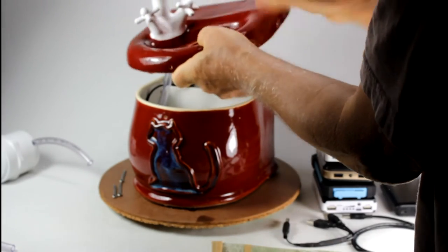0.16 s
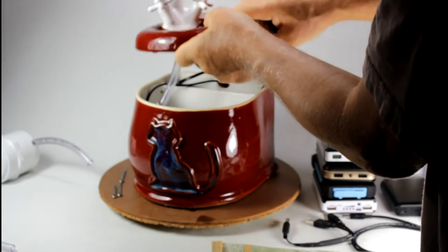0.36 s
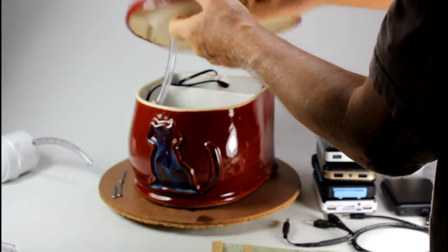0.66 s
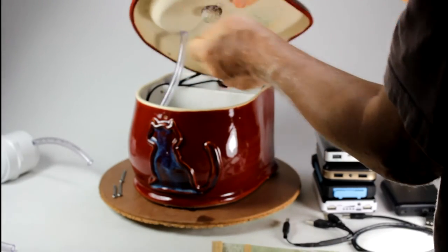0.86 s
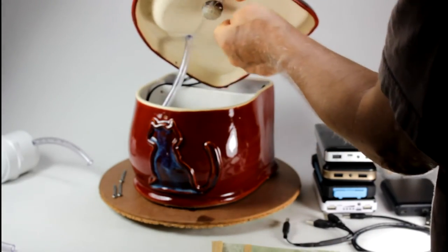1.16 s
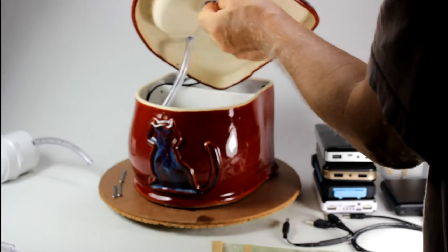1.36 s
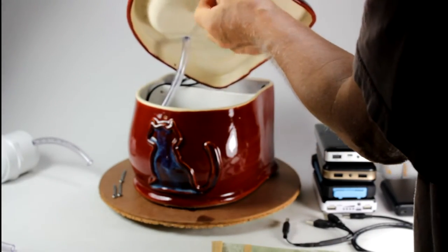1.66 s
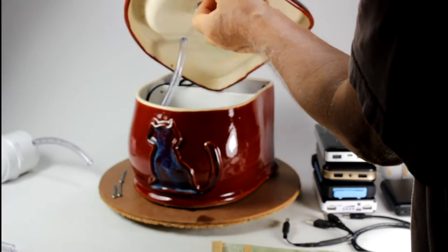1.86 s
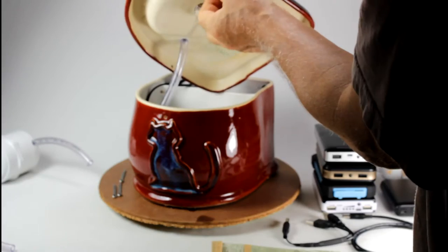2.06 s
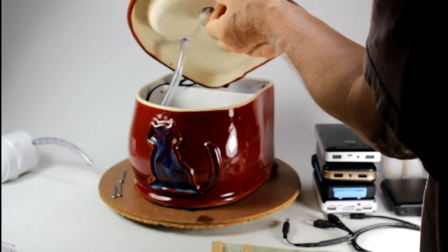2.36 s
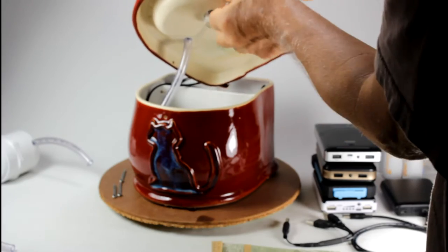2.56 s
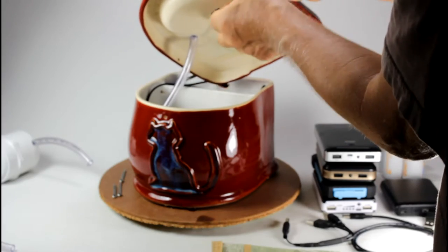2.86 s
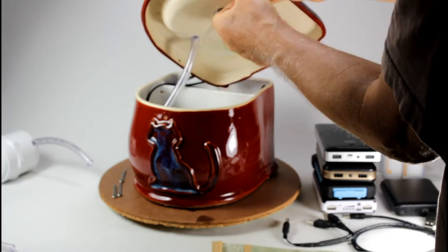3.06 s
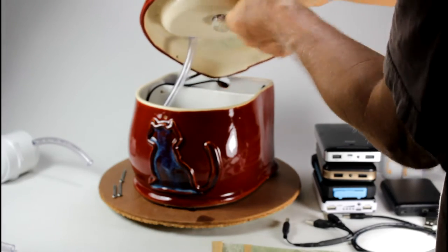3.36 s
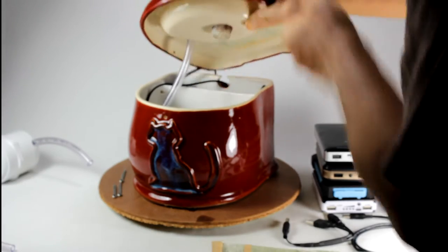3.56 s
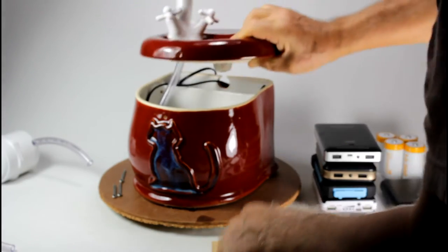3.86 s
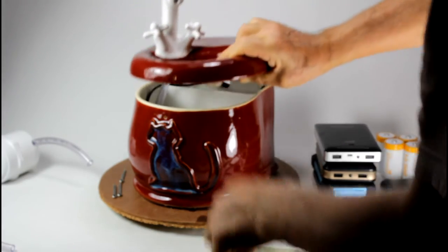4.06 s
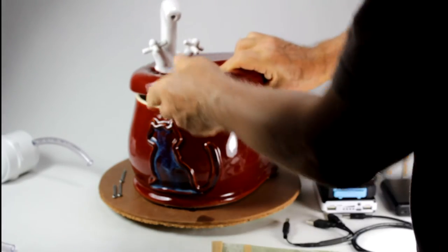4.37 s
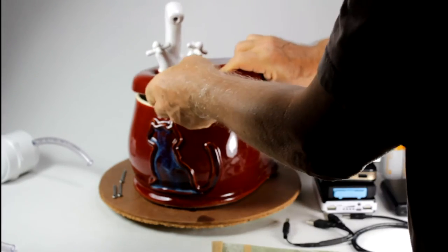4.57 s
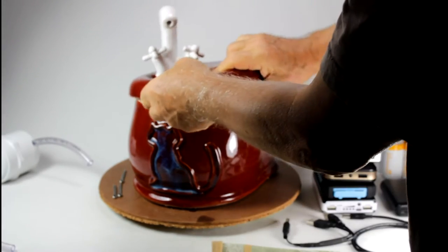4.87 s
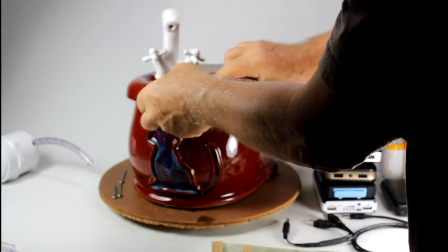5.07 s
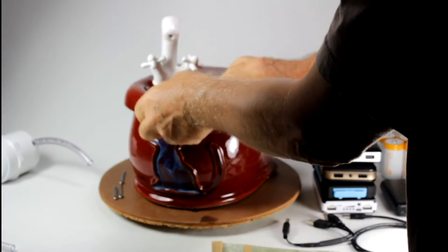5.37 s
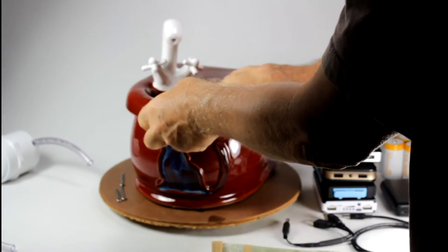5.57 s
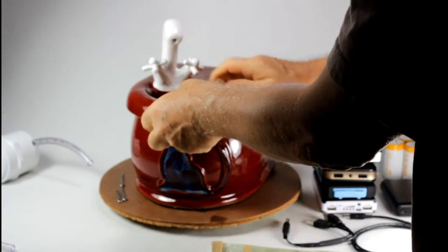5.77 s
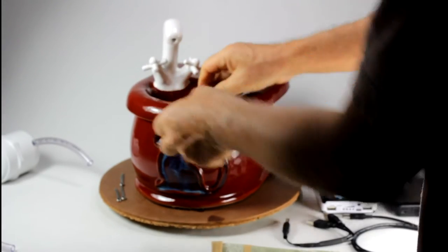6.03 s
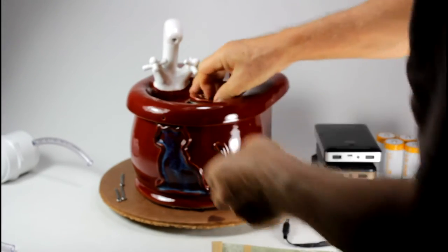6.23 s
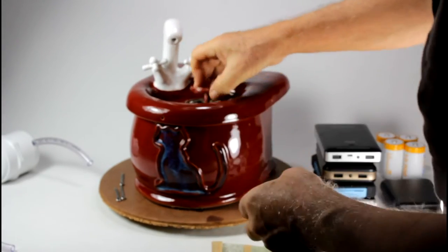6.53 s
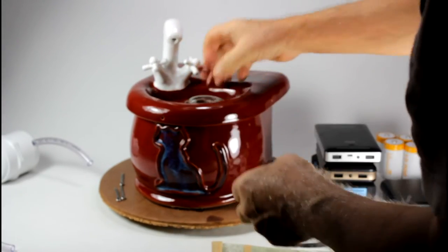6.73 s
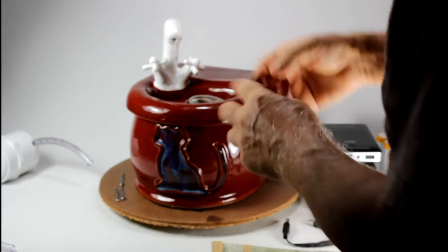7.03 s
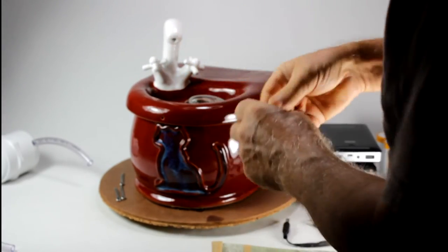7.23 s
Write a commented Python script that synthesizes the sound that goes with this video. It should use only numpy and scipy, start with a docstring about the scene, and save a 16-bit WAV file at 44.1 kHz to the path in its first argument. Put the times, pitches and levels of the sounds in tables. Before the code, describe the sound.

Irregular pottery clinks, dull knocks and gritty glaze rubs as a lid is lifted, turned and seated on a ceramic pot, over steady hiss.

```python
"""Ceramic lid and bowl

A glazed ceramic lid is handled over its bowl in a small room, close to a mono microphone.
Knocks and clinks ring the modes of lid and bowl over a dull knock; fingers and rim rub the glaze
as dense tiny clicks. Echoes and a steady hiss lie behind. The loudest blow overloads the recorder:
peaks clip with a low thump, and its gain control ducks everything, then creeps back."""
import sys
import numpy as np
from scipy import signal
from scipy.fft import rfft, irfft, next_fast_len
from scipy.io import wavfile

SR = 44100
rng = np.random.default_rng(int(sys.argv[2]) if len(sys.argv) > 2 else 0)


def int16_out(signal):
    """Quantize to a 16-bit WAV file."""
    q = np.round(np.clip(np.atleast_2d(signal).T, -1, 1) * 32767)
    wavfile.write(sys.argv[1], SR, q.astype(np.int16))


N = 326340   # length in samples


def from_db(db):
    """Turns decibels into an amplitude factor."""
    return 10 ** (np.asarray(db) / 20)


def rms_one(x):
    """Scales a signal to an RMS of one."""
    return x / np.sqrt(np.mean(x ** 2) + 1e-20)


# Blows of lid, bowl and fingers, one per row: start_s, lead_hz (mode that stands out), lift_db (of that mode),
# level_db, spot, bright_db (per octave), favoured_db (the spot's favoured modes),
# grip (share of ring time left), contact_ms (time constant of the onset)
BLOWS = [(0.342, 790, 4, -28, "bowl belly", -1, -9, 0.47, 10.5),
         (0.638, 5740, 17, -20, "lid stem", 0, -4, 1, 0.76),
         (0.7225, 4950, 8, -6, "bowl wall", 1, -0.1, 0.53, 0.73),
         (1.1225, 1905, 8.5, -25.5, "inner wall", 0, -1.5, 0.54, 1.6),
         (1.279, 474, 14, -27, "inner wall", 2.5, -14, 0.32, 2.3),
         (1.313, 360, 7, -32.5, "inner wall", -1, -4, 0.63, 4.5),
         (1.368, 1905, 7, -24.5, "inner wall", 0.8, -0.5, 0.73, 0.65),
         (1.4815, 2695, 6.5, -11, "lid face", 3, -0.9, 0.38, 0.3),
         (1.701, 590, 9, -37, "bowl wall", -3, -2.4, 0.63, 0.55),
         (1.749, 4550, 12, -49, "fingernail", 8.5, -8, 0.88, 6.7),
         (2.155, 3330, 11, -30.5, "lid stem", 6.5, 14.5, 0.15, 1.6),
         (2.2, 1185, -6, -19.5, "lid face", -1.5, 3.5, 0.49, 7),
         (2.232, 625, 4, -18, "lid face", 1.5, -5.5, 0.44, 0.97),
         (2.454, 2760, 9, -20.5, "lid stem", 2.1, -6.8, 0.61, 1.8),
         (3.106, 11500, 8, -52.5, "fingernail", 6, 2, 0.46, 1.6),
         (3.472, 6170, 7, -21, "fingernail", 1.5, 0, 0.71, 12),
         (3.798, 1400, 14.5, -24, "inner wall", 14.5, 4.5, 0.31, 2.2),
         (4.036, 950, 7, -28.5, "inner wall", 2, -8, 0.46, 1.4),
         (4.186, 625, 10.5, -25, "inner wall", -1.5, 2, 0.18, 0.57),
         (4.448, 1745, 5, -16, "inner wall", -2, -6, 0.58, 2.1),
         (4.627, 2135, -4, -3, "lid seat", 1.7, 1.2, 0.64, 4.6),
         (4.799, 3500, 15, -11, "lid stem", -3.8, 8.7, 0.44, 6.3),
         (4.869, 950, 2.5, -27.5, "lid seat", -3, 2, 0.69, 3.3),
         (5.268, 2135, 13.5, -17.5, "lid edge", 1.5, 2.5, 0.61, 1.4),
         (5.367, 410, 5, -32, "bowl belly", 2, 4, 0.67, 3.1),
         (5.461, 2135, 5.5, -30, "bowl rim", 5.5, -6, 1, 4.5),
         (5.5055, 950, 11, -6.5, "bowl rim", -5, -7, 0.14, 0.38),
         (5.5145, 360, 6.5, -1.1, "bowl rim", 1.27, 1.64, 0.55, 0.5),
         (5.803, 625, 4, -44, "lid edge", 1, -10, 0.94, 1.2),
         (5.915, 950, 1.5, -17.5, "lid edge", -3.5, 2, 0.97, 1),
         (6.049, 2008, 9, -16, "bowl belly", 6, 5.5, 0.36, 9),
         (6.14, 3790, 7.5, -17, "lid edge", -0.55, 0, 0.81, 1.3),
         (6.634, 360, 1, -38.5, "bowl belly", -2, -2.5, 0.42, 5.8),
         (6.689, 3790, 1, -24.5, "lid top", -0.3, -2, 0.91, 0.62),
         (6.736, 950, 12.5, -10, "bowl belly", 3.6, -9.5, 0.33, 6)]


def blows():
    """Each blow rings every mode and adds a dull knock; a longer contact softens its onset."""
    out = np.zeros(N + SR)
    t = np.arange(SR // 2) / SR
    chances = rng.standard_normal((len(BLOWS), len(WARE), 2))
    rattles = rng.standard_normal((len(BLOWS), 5, len(t)))
    for blow, chance, rattle in zip(BLOWS, chances, rattles):
        start_s, lead_hz, lift_db, level_db, spot, bright_db, favoured_db, grip, contact_ms = blow
        colour_db = blow_colour(spot, bright_db)
        rings = ringing(t, colour_db, spot, bright_db, favoured_db, lead_hz, lift_db, grip, chance)
        onset = 1 - np.exp(-1000 * t / max(contact_ms, .2))
        tail = np.minimum(1, (t[-1] - t) * 10)   # the last 100 ms fade out
        at = round(start_s * SR)
        out[at:at + len(t)] += from_db(level_db) * (rings + knock(t, colour_db, rattle)) * onset * tail
    return out[:N]


# Edges of the five registers, thud to top: edge_hz
REGISTERS_HZ = np.array([110, 300, 900, 2300, 5000, 15500])
CENTRES_HZ = np.sqrt(REGISTERS_HZ[1:] * REGISTERS_HZ[:-1])
PIVOT_HZ = 1500   # brightness turns about this pitch
# Spots that are struck, by name: (thud_db, low_db, middle_db, high_db, top_db),
# then the modes the spot favours as pairs (pitch_hz, level_db)
SPOTS = { "bowl wall": ([-28.5, -16.5, -2, -15.5, -36.5], [(590, -8), (625, -10), (780, -17.5), (1040, -9),
         (2008, -10), (3330, -12.5)]), "inner wall": ([-38, -9.5, -18.5, -22, -62], [(590, -24.5),
         (625, -21.5), (700, -21), (1400, -15.5), (1745, -11), (1905, -15.5)]),
         "lid face": ([-32, -9.5, -5, -17, -36], [(625, -17), (790, -22.5), (1040, -19.5), (1185, -5.5),
         (1745, -9), (2135, -40)]), "lid seat": ([-23, -1, -6, -15, -32.5], [(474, -4.5), (590, -10),
         (950, -8), (1040, -14.5), (1185, -14.5), (2135, -13.5)]),
         "lid stem": ([-53, -44, -17.5, -12.5, -32], [(950, -21.5), (2008, -25), (2760, -12.5), (3100, -21),
         (3330, -21.5), (3790, -33)]), "lid edge": ([-52, -19, -16, -2, -15], [(950, -20), (1185, -18),
         (3500, -11.5), (3790, -30.5), (4550, -17.5), (5460, -18.5), (6900, -13.5)]),
         "lid top": ([-38, -22, -23, -25, -12], [(2135, -36), (2760, -22), (3100, -24), (3790, -20),
         (4550, -5.5), (6900, -8)]), "bowl belly": ([-9.5, -5, -12, -23.5, -36.5], [(360, -11), (410, -7.5),
         (474, -11.5), (790, -25), (950, -16), (1040, -17)]), "bowl rim": ([-50, -10.5, -2.5, 0.6, -24],
         [(360, -19.5), (625, -15), (950, -14.5), (1470, -3.5), (2695, -8.5), (4200, -26.5)]),
         "fingernail": ([-44, -65, -59, 2, -6], [(2135, -18), (4550, -15), (5700, -9), (6170, -1),
         (6900, -9), (11500, -17)]), }


def blow_colour(spot, bright_db):
    """Level in each register: the colour of the struck spot, tilted by the blow's brightness."""
    return SPOTS[spot][0] + bright_db * np.log2(CENTRES_HZ / PIVOT_HZ)


# Modes of lid and bowl: pitch_hz, struck_db, rubbed_db, t60_s (ringing free)
WARE = [(383.3, 2, -10, 0.4), (418.4, -5.5, 7.5, 0.13), (462, 7.5, 2.5, 0.18), (582.3, 2.5, -25.5, 0.17),
        (627, -0.5, -3, 0.28), (699.4, 1, -34, 0.2), (788, 4.5, -22, 0.21), (800, -21.5, -27, .2),
        (951, 2, -14, 0.19), (1044.4, -3, -9.5, 0.31), (1184, -1, 0, 0.65), (1385, 5.5, -32, 0.092),
        (1478.5, -2, -9.5, 0.52), (1717, 0.5, -15, 0.12), (1890, 1.5, -33.5, 0.12), (2018, -1, -25, 0.31),
        (2136, -8.5, -3, 0.6), (2716, 1, -9.5, 0.44), (2791, 2.5, 3, 0.11), (3088, -1.5, 1, 0.35),
        (3333, 6.5, -15, 0.13), (3515, -3, 1.5, 0.16), (3803, -8, -35, 0.34), (4330, -0.5, -7.5, .3),
        (4492, -10.5, -2.5, 0.22), (4870, -14.5, -34.5, 0.048), (4950, -21.5, -36, .2),
        (5516, -4, -22, 0.26), (5720, -2, -1, 0.11), (6043, 11.5, -22.5, 0.055), (6936, -1.5, -7.5, 0.24),
        (8700, -0.5, -11.5, .15), (9340, -8, -2, 0.4), (11420, -1.5, -27, 0.17), (13180, 3, -22, .1)]
# The spot's other modes: level, random spread, share of the favoured modes' ring time
OTHERS_DB, SPOT_SPREAD_DB, OTHERS_RING = -13.5, 3.5, 0.6
# Twin modes: level against the first, ring time as a multiple, pitch offset as a share
TWIN_DB, TWIN_LONGER, TWIN_SPLIT = -14, 1.9, 0.00583


def ringing(t, colour_db, spot, bright_db, favoured_db, lead_hz, lift_db, grip, chance):
    """Decaying sines: the spot's favoured modes follow their own levels, the rest its colour."""
    hz, struck_db, _, t60 = np.transpose(WARE)
    spread_db = SPOT_SPREAD_DB * chance[:, 0]
    db = np.interp(np.log(hz), np.log(CENTRES_HZ), colour_db) + struck_db + OTHERS_DB + spread_db
    liked_hz, liked_db = np.transpose(SPOTS[spot][1])
    liked = np.abs(hz[:, None] - liked_hz).argmin(axis=0)
    db[liked] = liked_db + favoured_db + bright_db * np.log2(hz[liked] / PIVOT_HZ)
    lead = np.abs(hz - lead_hz).argmin()
    db[lead] += lift_db
    # the fingers rest on the nodes of the favoured modes and damp the others more
    is_liked = np.isin(np.arange(len(hz)), np.append(liked, lead))
    ring_left = np.clip(grip, .1, 1.5) * np.where(is_liked, 1, OTHERS_RING)
    fall = -np.log(1000) * t / (t60 * ring_left)[:, None]
    # a round vessel has its modes in pairs: the weaker twin lies close by, beats with the first and outlasts it
    tones = np.exp(fall) * np.sin(2 * np.pi * hz[:, None] * t)
    twins = np.exp(fall / TWIN_LONGER) * np.sin(2 * np.pi * hz[:, None] * (1 + TWIN_SPLIT) * t)
    signs = np.sign(chance[:, 1])
    return (from_db(db) * signs) @ tones + from_db(db + TWIN_DB) @ twins


# Knock level in each register, thud to top: level_db
KNOCK_DB = [-4, -8, -6, -6, -1]
KNOCK_T60_S, KNOCK_DAMPING = .065, .25   # fade at 1 kHz; exponent that shortens it towards the treble


def knock(t, colour_db, rattle):
    """Dense unresolved modes heard as fading noise bands, which die faster in the treble."""
    t60 = KNOCK_T60_S * (1000 / CENTRES_HZ) ** KNOCK_DAMPING
    edges = zip(REGISTERS_HZ, REGISTERS_HZ[1:])
    out = np.zeros(len(t))
    for pair, white, level_db, band_t60 in zip(edges, rattle, colour_db + KNOCK_DB, t60):
        band = signal.butter(4, pair, "band", fs=SR, output="sos")
        noise = rms_one(signal.sosfilt(band, white))
        out += from_db(level_db) * noise * from_db(-60 * t / band_t60)
    return out


# Rubbing strokes, one per row: peak_s, sing_hz (mode that sings), sing_db (push on it),
# swell_s, fade_s, level_db, kind, bright_db (per register)
STROKES = [(0.41, 5740, -55, 0.054, 0.09, -61.5, "hiss", 12),
           (0.494, 5740, -54, 0.061, 0.019, -58, "hiss", 7), (0.57, 3500, -59, 0.067, .06, -57, "hiss", 2),
           (0.94, 4500, -60, 0.043, .05, -48.5, "hiss", -0.5),
           (1.761, 4500, -44, 0.014, 0.081, -45.5, "hiss", 1.5),
           (1.968, 4500, -40, 0.093, 0.07, -39, "hiss", 0),
           (2.079, 2135, -38, 0.038, 0.057, -33, "hiss", -2),
           (2.405, 1185, -41, 0.073, 0.019, -47.5, "ring", -2.5),
           (3.113, 5740, -44, 0.0031, 0.0072, -44.5, "hiss", 11),
           (3.155, 2135, -42, .035, 0.11, -37, "ring", 1.5),
           (3.331, 1185, -32, 0.013, 0.11, -43.5, "ring", -3), (3.39, 2135, -31, .08, 0.11, -38, "hiss", 3),
           (3.519, 6140, -37, 0.11, 0.076, -30.5, "hiss", 4),
           (3.935, 1905, -55, 0.048, 0.082, -49, "ring", 2.5),
           (4.228, 6900, -48, .015, 0.03, -59, "hiss", 13),
           (4.741, 3100, -29, 0.093, 0.083, -26.5, "grind", 3.5),
           (4.811, 2760, -28, 0.012, 0.058, -24, "ring", 2.3),
           (4.9, 950, -41, 0.14, 0.1, -39.5, "grind", 4.5),
           (5.085, 6900, -42, .02, 0.092, -49, "ring", 4.5),
           (5.2, 3100, -52.5, 0.26, 0.036, -51.5, "ring", -6),
           (5.71, 1470, -42, .02, 0.035, -46.5, "ring", -8),
           (5.939, 950, -35, .015, 0.086, -36, "ring", 4.5),
           (6.071, 410, -42, 0.033, 0.13, -38, "grind", -2),
           (6.132, 2008, -35, 0.095, .02, -43.5, "grind", -1.2),
           (6.181, 6140, -40, 0.016, 0.096, -38.5, "ring", 3.5),
           (6.24, 1185, -47, 0.044, 0.12, -49, "grind", 3)]
# Kinds of rubbing, by name: low_grind_db, middle_ring_db, high_ring_db, hiss_db
RUBS = {"hiss": [-40, -12, -6, -2.8], "ring": [-24.5, 1.1, -7.5, -8.5], "grind": [0.1, -8.5, -15.5, -19.5]}
STROKE_RANGE_DB = 26   # a stroke rises and falls this far over its swell and fade times


def pressure():
    """Strength of the rubbing in each register, and extra on the mode that sings: strokes swell and fade."""
    t, modes = np.arange(N) / SR, np.array(WARE)[:, 0]
    levels, singing = np.zeros((4, N)), {}
    for peak_s, sing_hz, sing_db, swell_s, fade_s, level_db, kind, bright_db in STROKES:
        away = np.maximum((peak_s - t) / max(swell_s, .003), (t - peak_s) / max(fade_s, .003))
        shape = from_db(-STROKE_RANGE_DB * np.minimum(away, 5))
        register_db = level_db + np.array(RUBS[kind]) + bright_db * np.arange(-2, 2)
        levels += np.outer(from_db(register_db), shape)
        mode = modes[np.abs(modes - sing_hz).argmin()]
        singing[mode] = singing.get(mode, 0) + from_db(sing_db) * shape
    return levels, singing


GRAINS_PER_S, GRAIN_SPREAD_DB, GRAIN_TOP_HZ = 1800, 3, 8110


def glaze_grains():
    """Dense tiny clicks of random size and sign, as glaze grains catch."""
    sizes = from_db(GRAIN_SPREAD_DB * np.minimum(rng.exponential(1, N), 5)) * rng.choice([-1, 1], N)
    clicks = rms_one(sizes * (rng.random(N) < GRAINS_PER_S / SR))
    # a grain lasts a finite time
    return rms_one(signal.lfilter(*signal.butter(1, GRAIN_TOP_HZ, fs=SR), clicks))


def ring(x, hz, t60):
    """A resonator: a unit click sets a sine of height 1 ringing."""
    r, w = from_db(-60 / (t60 * SR)), 2 * np.pi * hz / SR
    return signal.lfilter([0, np.sin(w)], [1, -2 * r * np.cos(w), r * r], x + 1e-18)


def drift(per_s):
    """Slow chance: random points joined by straight lines."""
    points = rng.standard_normal(200)
    return np.interp(np.arange(N) / SR * per_s, np.arange(len(points)), points)


# Grains heard directly, in the four registers above the thud: level_db
RUB_NOISE_DB = [-14, -13, -8.5, -6]
RUB_RING_DB = -6.5
HELD_SHARE, HELD_DAMPING = 0.57, 0.93   # ring time left by the hand; exponent that shortens it above 2 kHz
WANDER_DB, WANDER_PER_S = 2.5, 9


def rubbing():
    """Glaze grains are heard directly and ring the modes, as hard as the strokes press."""
    levels, singing = pressure()
    grains = glaze_grains()
    out = np.zeros(N)
    for level, noise_db, low, high in zip(levels, RUB_NOISE_DB, REGISTERS_HZ[1:], REGISTERS_HZ[2:]):
        for hz, _, rubbed_db, t60 in WARE:
            if low <= hz < high:
                # the hand shortens the ring, most in the treble
                held = HELD_SHARE * t60 * min(1, 2000 / hz) ** HELD_DAMPING
                build_up = np.sqrt(held * SR / (4 * np.log(10)))   # evens out long and short rings
                # the contact wanders, so each mode swells and fades
                wander = from_db(WANDER_DB * drift(WANDER_PER_S))
                push = (level + singing.get(hz, 0)) * grains * wander
                out += from_db(RUB_RING_DB + rubbed_db) / build_up * ring(push, hz, held)
        band = signal.butter(4, [low, high], "band", fs=SR, output="sos")
        out += from_db(noise_db) * level * rms_one(signal.sosfilt(band, grains))
    return signal.sosfilt(signal.butter(2, 280, "high", fs=SR, output="sos"), out)


ROOM_DB, ROOM_T60_S, WALL_CUT_HZ = -13, 0.29, 13300


def room(x):
    """Ten feedback delays, duller on every round, stepped block by block."""
    out, dull = np.zeros(N), np.exp(-2 * np.pi * WALL_CUT_HZ / SR)
    for k, lag in enumerate((np.geomspace(.0071, .0313, 10) * SR).astype(int)):
        loop, gain, state = x.copy(), from_db(-60 * lag / SR / ROOM_T60_S), [0.]
        for i in range(lag, N, lag):
            back, state = signal.lfilter([gain * (1 - dull)], [1, -dull], loop[i - lag:i], zi=state)
            loop[i:i + lag] += back[:N - i]
        out += (loop - x) * (-1) ** k   # echoes only, with alternating sign
    return out


def coloured(x, hz, db):
    """Shapes a noise to a spectrum drawn on a log-frequency axis."""
    size = next_fast_len(len(x))
    bins = np.maximum(np.arange(size // 2 + 1) * SR / size, 1)
    gains = from_db(np.interp(np.log(bins), np.log(hz), db))
    return irfft(rfft(x, size) * gains, size)[:len(x)]


# Spectrum of room tone and preamp hiss: pitch_hz, level_db (per Hz, relative)
HISS = [(12, -11), (20, -10), (22, 0.5), (49, -5), (204, -6), (241, 0), (337, -7.5), (527, -7), (573, -9),
        (779, -9), (1000, -10.5), (1090, -9.5), (16000, -23.5)]
HISS_DB = -54.5   # RMS


def background_hiss():
    """Steady room tone and preamp hiss: white noise shaped to a drawn spectrum."""
    return from_db(HISS_DB) * rms_one(coloured(rng.standard_normal(N), *np.transpose(HISS)))


def scene():
    """Ware, its room and the steady hiss."""
    ware = blows() + rubbing()
    hiss = background_hiss()
    return (ware + from_db(ROOM_DB) * room(ware) + hiss)[None]


# Gain control: threshold, dB of ducking per dB over it, recovery, smoothing time constant, delay
DUCK_FROM_DB, DUCK_SHARE, RECOVER_DB_PER_S, DUCK_S, DUCK_LATE_S = -0.5, 1.58, 15, 0.00399, 0.02


def gain_control(dry):
    """Ducks after an overload and creeps back at a steady rate in decibels."""
    over_db = DUCK_SHARE * np.maximum(20 * np.log10(np.abs(dry[0]) + 1e-9) - DUCK_FROM_DB, 0)
    creep = RECOVER_DB_PER_S * np.arange(N) / SR
    held_db = np.maximum.accumulate(over_db + creep) - creep
    # the control answers late
    held_db = np.interp(np.arange(N) - DUCK_LATE_S * SR, np.arange(N), held_db)
    r = np.exp(-1 / (DUCK_S * SR))
    return dry * from_db(-signal.lfilter([1 - r], [1, -r], held_db))


TOP, LOPSIDED, THUMP_HZ = 0.87, 0.2, 350.5   # clipping height, share turned to thump, thump's low-pass
OFFSET, CUTOFF_HZ = 0.001197, 15950   # constant offset, top of the band


def record(dry):
    """Gain control ducks, peaks clip with a low thump, and the top is cut."""
    ducked = gain_control(dry)
    clipped = ducked / (1 + np.abs(ducked / TOP) ** 14) ** (1 / 14)
    # the overload is lopsided: what is cut off is partly rectified into a low thump
    thump = signal.lfilter(*signal.butter(1, THUMP_HZ, fs=SR), np.abs(ducked - clipped))
    lopsided = clipped - LOPSIDED * thump
    return signal.sosfilt(signal.ellip(12, .5, 95, CUTOFF_HZ, fs=SR, output="sos"), lopsided + OFFSET)


dry = scene()
out = record(dry)
int16_out(out)
```